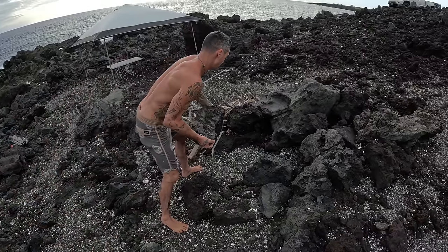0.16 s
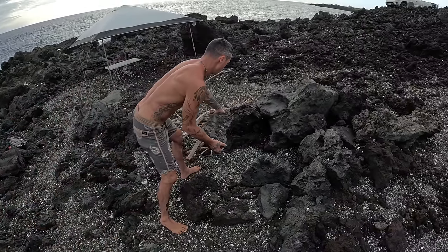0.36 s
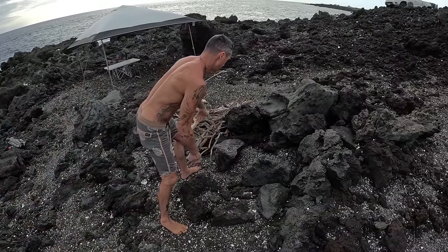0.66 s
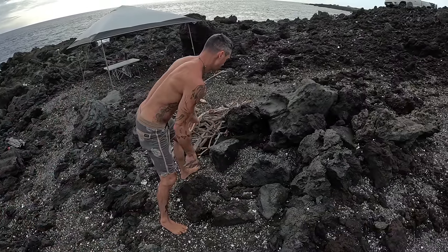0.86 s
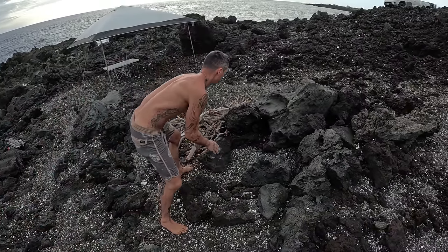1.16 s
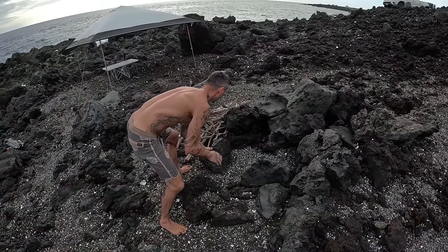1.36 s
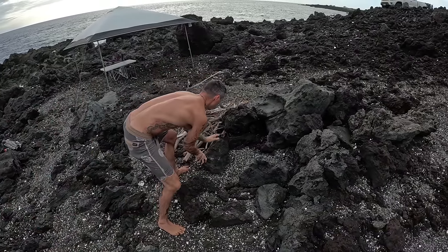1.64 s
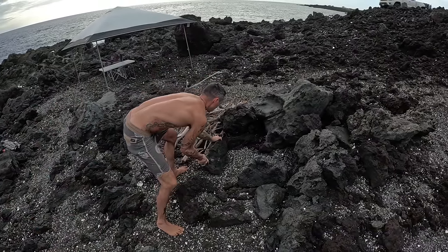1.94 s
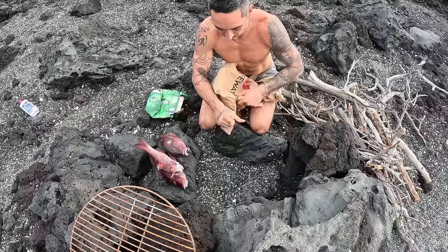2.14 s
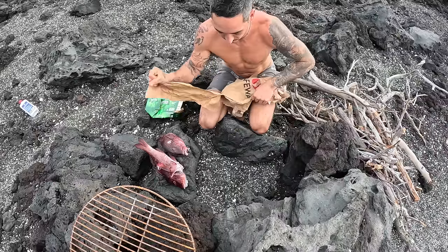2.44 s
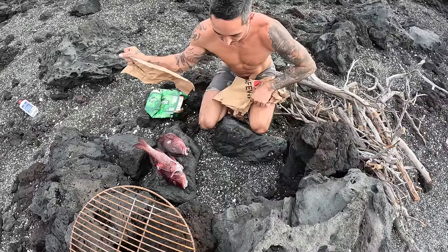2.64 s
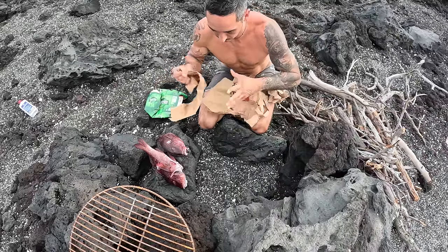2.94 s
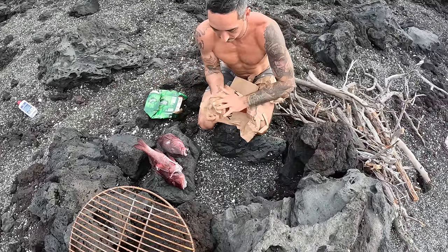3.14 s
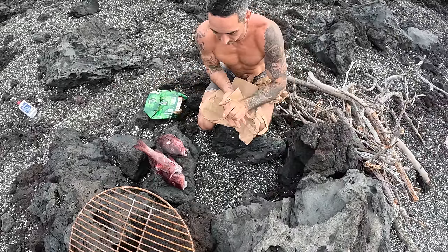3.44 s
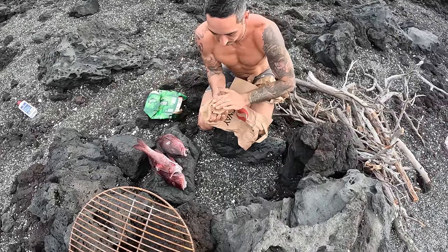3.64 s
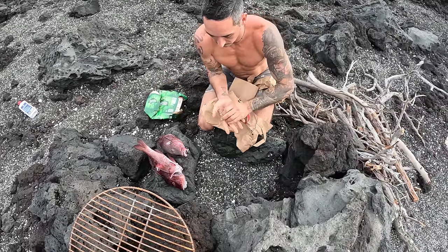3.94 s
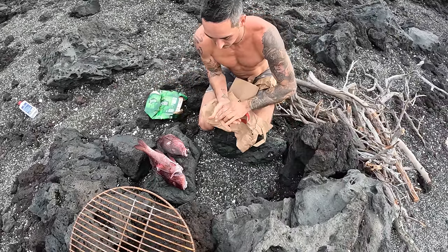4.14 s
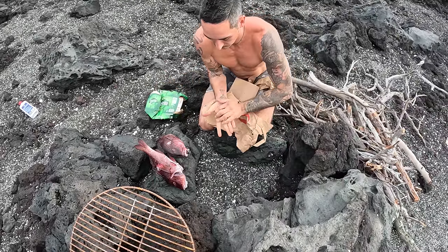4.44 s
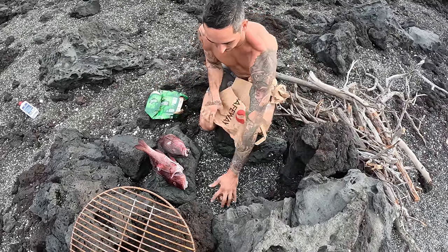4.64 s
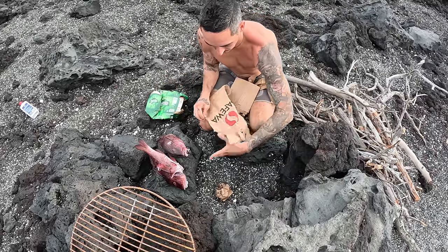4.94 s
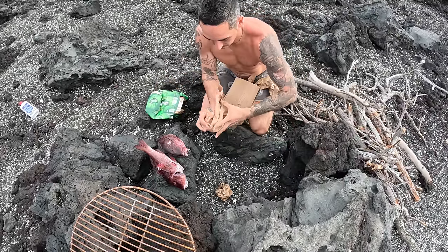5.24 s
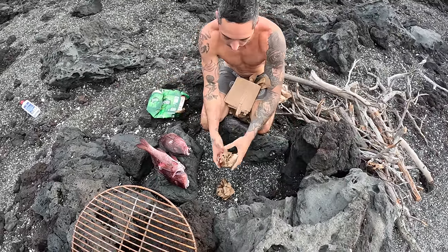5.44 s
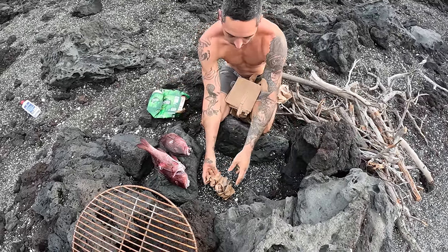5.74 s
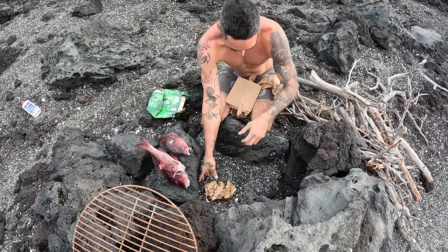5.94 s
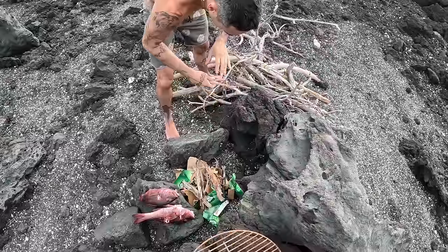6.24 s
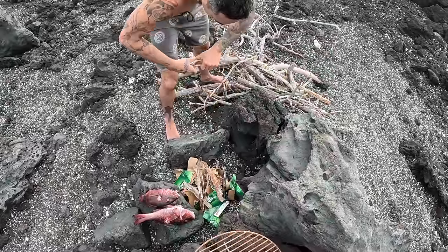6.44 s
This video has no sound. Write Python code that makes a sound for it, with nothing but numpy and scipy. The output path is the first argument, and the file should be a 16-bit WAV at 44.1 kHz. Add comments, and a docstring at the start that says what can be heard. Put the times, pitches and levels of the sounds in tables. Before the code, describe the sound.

An open rocky shore, heard close and nearly mono, with faint distant surf and deep wind buffeting throughout. Small pebble clicks and light gravel shuffling open the scene; at 0.6 s a dry stick cracks sharply with a dull knock and splintery ring. A much weaker crack comes at about 1 s amid a gravel crunch, then quiet stirring. From 2.15 s a paper bag rips in a dense, fibrous pull of about a quarter second, followed by a short, abrupt pull at 2.54 s. Thin high whistles glide faintly near 2.7, 2.9 and 4.1 s. From 2.6 to 4.8 s the paper is kneaded in soft crackling bursts with occasional snaps. Between 4.9 and 5.45 s coarser squeezes bring clustered ringing pops, the strongest at 5.1 s. Pebbles click around 5.6 s, and the wad lands with a tick at 5.9 s. Gusts rumble hardest from 5.7 s to the end.

```python
"""A paper bag rips in two pulls as dense streams of breaking fibres, then is crumpled into a wad and set down:
creases crackle over rubbing noise, and buckling folds snap as short rings. Before the rip, a dry stick cracks
in ringing splinters over a dull knock. Gravel grinds, and pebbles and a paper tick click, as noise; bird-like
whistles glide as sines. Behind, surf swells and wind rumbles on a nearly mono microphone, as shaped noise."""
import sys
import numpy as np
from scipy import signal
from scipy.fft import rfft, irfft, next_fast_len
from scipy.io import wavfile
from scipy.ndimage import map_coordinates

SR = 44100
rng = np.random.default_rng(int(sys.argv[2]) if len(sys.argv) > 2 else 0)


def unload_wav(signal):
    """Save mono or channel-first audio to the path in sys.argv[1] as 16-bit WAV at rate SR, clipped to [-1, 1]."""
    wavfile.write(
        sys.argv[1],
        SR,
        np.round(np.clip(np.atleast_2d(signal).T, -1, 1) * 32767).astype(np.int16),
    )


N = 290619
TIME = np.arange(N) / SR  # seconds


def amp(db):
    """Decibels to gain."""
    return 10 ** (np.asarray(db) / 20)


def unit(x):
    """Scale to rms 1."""
    return x / np.sqrt(np.mean(x ** 2) + 1e-20)


def along(points, hz):
    """Read (Hz, value) points at hz, on a log frequency axis."""
    point_hz, value = np.transpose(points)
    return np.interp(np.log(hz + 1), np.log(point_hz + 1), value)


def filtered(x, response):
    """Filter x by a gain given as a function of frequency."""
    length = next_fast_len(x.shape[-1] + 8192)
    gain = response(np.fft.rfftfreq(length, 1 / SR))
    return irfft(rfft(x, length) * gain, length)[..., :x.shape[-1]]


def coloured(x, spectrum):
    """Tilt x by a table of relative levels over frequency, at rms 1."""
    return unit(filtered(x, lambda hz: amp(along(spectrum, hz))))


def band(x, lo_hz, hi_hz):
    """Causal band-pass with steep skirts."""
    edges_hz = [lo_hz, min(hi_hz, SR / 2 - 1)]
    return signal.sosfilt(signal.butter(3, edges_hz, "band", fs=SR, output="sos"), x)


def wobble(knots_per_s):
    """A smooth random curve through random knots."""
    knots = rng.standard_normal(int(N * knots_per_s / SR) + 4)
    return map_coordinates(knots, [TIME * knots_per_s])


def crackle(slips_per_s, spread_db, t60_s, size=1024):
    """Tiny slips of uneven strength ring a body whose shape, and so its ring, changes every size samples."""
    shape = (N // size + 1, size)
    happens = rng.random(shape) < slips_per_s / SR
    slips = happens * amp(spread_db * np.minimum(rng.standard_normal(shape), 2))
    slips *= rng.choice([-1, 1], shape)
    rings = rng.standard_normal(shape) * amp(-60 * np.arange(size) / SR / t60_s)
    rings /= np.linalg.norm(rings, axis=1, keepdims=True)
    rung = irfft(rfft(slips, 2 * size) * rfft(rings, 2 * size))
    # each block's tail spills into the next
    blocks = rung[:, :size] + np.roll(rung[:, size:], 1, axis=0)
    return unit(blocks.ravel()[:N])


def creases(slips_per_s, spread_db, t60_s):
    """Folds of three sizes crackle independently, each in its own range; the smallest merge into a hiss."""
    ranges_hz = [(150, 1400), (1400, 3000), (3000, 6000)]
    folds = sum(band(crackle(slips_per_s, spread_db, t60_s), lo, hi) for lo, hi in ranges_hz)
    return folds + band(crackle(10 * slips_per_s, spread_db, t60_s), 6000, 20000)


def stroke(rows, attack_s, release_s, sag_db_per_s=0):
    """Body and hiss gains of a run of strokes: each swells, holds or sags, and dies away."""
    power = np.zeros((2, N))
    for start_s, length_s, *levels_db in rows:
        held_s = np.clip(TIME - start_s, 0, length_s)
        after_s = np.maximum(TIME - start_s - length_s, 0)
        swell = np.minimum(held_s / attack_s, 1)
        shape = swell * amp(-sag_db_per_s * held_s) * np.exp(-after_s / release_s)
        power += np.outer(amp(levels_db), shape) ** 2
    return np.sqrt(power)


def rustle(gains, spectrum, grains, rub_db):
    """Grains plus smooth rubbing; the body and the hiss above it each follow their own level."""
    body_gain, hiss_gain = gains
    rubbing = amp(rub_db) * rng.standard_normal(N)
    sound = coloured(grains + rubbing, spectrum)
    body = filtered(sound, lambda hz: 1 / (1 + (hz / 6000) ** 7))
    hiss = sound - body
    return body_gain * unit(body) + hiss_gain * unit(hiss)


BREEZE_DB = -39  # between the gusts
# Gusts over the breeze: middle_s, half_width_s (power falls to 1/e), level_db
GUSTS = [(0.68, 0.18, -31.5), (1.45, 0.041, -32.5), (2.4, 0.21, -32), (2.95, 0.16, -26),
         (4.38, 0.18, -34.5), (4.95, 0.12, -28.5), (5.7, 0.23, -21.5), (6.1, 0.085, -22.5),
         (6.6, 0.17, -24.5)]
# Tone of wind buffeting the microphone: freq_hz, relative_level_db
BUFFET_TONE = [(8, -2.5), (19, -1), (28, -17), (50, -22), (100, -31), (130, -33.5), (175, -40.5),
               (400, -61), (1000, -120)]


def wind(eddy_db=1.5, eddies_per_s=9):
    """Eddies push slowly on the microphone; gusts rise and fall over a steady breeze."""
    power = amp(BREEZE_DB) ** 2
    power = power + sum(amp(db) ** 2 * np.exp(-((TIME - mid_s) / width_s) ** 2) for mid_s, width_s, db in GUSTS)
    eddies = amp(eddy_db * wobble(eddies_per_s))
    return np.sqrt(power) * eddies * coloured(rng.standard_normal(N), BUFFET_TONE)


# Swell of the breakers: time_s, level_db
SURF_SWELL = [(0, -50), (1.02, -47.5), (1.82, -47), (2.1, -44.5), (2.7, -50), (3.2, -50), (3.56, -52.5),
              (4.8, -50.5), (5.5, -49), (6.23, -48), (6.57, -44.5)]
# Tone of the distant sea: freq_hz, relative_level_db
SEA_TONE = [(50, 0), (100, 0.5), (170, -7), (260, -4.5), (420, -2.5), (700, -4), (1000, -8), (2000, -13.5),
            (4000, -21), (7000, -31), (10000, -35.5), (15800, -39)]


def surf():
    """Distant breakers swell slowly, as noise with a falling treble."""
    swell_db = np.interp(TIME, *np.transpose(SURF_SWELL))
    return amp(swell_db + 0.13 * wobble(7.7)) * coloured(rng.standard_normal(N), SEA_TONE)


# Bird-like whistles: start_s, length_s, start_hz, end_hz, level_db (sine peak before flutter)
WHISTLES = [(2.688, 0.046, 8450, 8100, -58), (2.923, 0.14, 8150, 7700, -63), (4.094, .09, 7200, 7850, -60)]


def whistles():
    """Thin, high sines glide while their pitch wavers and their level flutters."""
    out = np.zeros(N)
    for start_s, length_s, start_hz, end_hz, level_db in WHISTLES:
        progress = np.clip((TIME - start_s) / length_s, 0, 1)
        glide_hz = start_hz + (end_hz - start_hz) * progress
        hz = glide_hz * (1 + 0.011 * wobble(110))
        flutter = amp(4 * wobble(90))
        swell = np.sin(np.pi * progress)
        out += amp(level_db) * flutter * swell * np.sin(2 * np.pi * np.cumsum(hz) / SR)
    return out


# Shuffles of the feet: start_s, length_s, crunch_db, grit_db
GRAVEL = [(0.35, 0.11, -55, -57.5), (0.615, 0.028, -40.5, -41.5), (0.705, 0.14, -57.5, -56.5),
          (0.945, 0.04, -36.5, -56), (0.99, 0.089, -46.5, -50.5), (1.08, 0.23, -55, -55),
          (1.3, .24, -59.5, -60), (1.96, .07, -58, -63), (2.01, 0.1, -51, -57)]
# Quiet gravel stirring under and after the shuffles: start_s, length_s, crunch_db, grit_db
GRAVEL_STIR = (0.16, 4.1, -64, -65)
# Tone of the stones: freq_hz, relative_level_db
STONE_TONE = [(300, -14), (1000, -11), (2500, -6.5), (5000, -9.5), (7000, -11), (10000, -12), (12500, -12),
              (15800, -12.5)]
# Clicks of pebbles, and a paper tick as the wad is set down (5.925 s):
# start_s, level_db (before the click trim), pitch_hz
CLICKS = [(0.141, -40.5, 3500), (0.22, -45, 7240), (1.442, -44, 10000), (1.471, -43, 10000),
          (1.675, -47, 7500), (5.583, -33.5, 3820), (5.611, -34.5, 2950), (5.667, -32.5, 4100),
          (5.691, -39.5, 6400), (5.925, -31, 3800), (5.95, -52, 4500)]


def gravel_and_clicks(click_trim_db=-3, click_t60_s=0.023):
    """Feet grind many grains of fine gravel; pebbles, and one paper tick, click as short noise bursts."""
    grit = creases(slips_per_s=2900, spread_db=8, t60_s=0.002)
    gains = stroke(GRAVEL + [GRAVEL_STIR], attack_s=0.029, release_s=0.016)
    out = np.pad(rustle(gains, STONE_TONE, grit, rub_db=-4.0), (0, SR))
    t = np.arange(SR // 20) / SR
    for start_s, level_db, hz in CLICKS:
        click = unit(band(rng.standard_normal(len(t)), hz / 2, hz * 1.42))
        click = click * amp(-60 * t / click_t60_s)
        out[round(start_s * SR):][:len(t)] += amp(level_db + click_trim_db) * click
    return out[:N]


# Cracks of dry wood: break_s, level_db, build_up_s, t60_s, knock_db (relative to level_db)
STICKS = [(0.607, -21, 0.0079, 0.062, -3.5), (0.984, -40.5, 0.049, 0.12, 5.5)]
# Tone of the wood: freq_hz, relative_level_db
WOOD_TONE = [(120, -16), (250, -3), (500, -6), (800, -1), (1300, -8), (1800, -10), (2250, -4), (3000, -7),
             (4500, -13), (7500, -18), (15800, -21)]


def sticks():
    """Dry fibres splinter harder and harder until the wood gives with a dull knock."""
    splinters = coloured(crackle(slips_per_s=9000, spread_db=3, t60_s=0.002), WOOD_TONE)
    knocks = unit(band(rng.standard_normal(N), 26, 166))
    out = np.zeros(N)
    for break_s, level_db, build_s, t60_s, knock_db in STICKS:
        before_s, after_s = np.maximum(break_s - TIME, 0), np.maximum(TIME - break_s, 0)
        out += splinters * amp(level_db - 11.7 * (before_s / build_s) ** 2 - 60 * after_s / t60_s)
        out += knocks * amp(level_db + knock_db - 60 * before_s / 0.012 - 60 * after_s / 0.15)
    return out


# Folds that buckle: start_s, level_db, centre_hz, edge_db (relative to level_db)
SNAPS = [(2.1625, -33.5, 2780, -20), (2.236, -27, 1870, -20), (2.3039, -25, 2010, -8),
         (2.5234, -32, 2680, -21), (2.773, -35.5, 1330, -24), (3.0782, -43.5, 2430, -11),
         (3.107, -35, 1630, -19.5), (3.1876, -28.5, 2360, -30), (3.287, -35.5, 2560, -20),
         (3.343, -36.5, 3230, -19), (4.0248, -37, 1860, -19), (4.4982, -42.5, 1490, -18),
         (4.6878, -35.5, 2350, -16), (4.753, -44, 2450, -13), (4.775, -38.5, 1200, -28),
         (4.914, -28.5, 1380, -39), (4.9748, -35.5, 1900, -34), (4.989, -31.5, 2040, -36),
         (5.012, -36.5, 1520, -33), (5.048, -32, 1830, -24), (5.059, -29, 1080, -36),
         (5.117, -17.5, 1760, -21.5), (5.1587, -34.5, 2030, -20), (5.229, -38, 1450, -14),
         (5.268, -34.5, 2110, -21), (5.2985, -34.5, 1590, -32), (5.313, -32, 2240, -11),
         (5.3249, -31, 1310, -18), (5.4126, -26.5, 2000, -12.5), (5.4292, -24, 1440, -23)]
# Ring modes of the bag: freq_hz, width_hz (not played), strength_db (halved when played)
BAG_MODES = [(943, 56, 15.5), (1686, 35, -15), (2136, 84, -13), (2700, 110, -14), (3500, 110, -9),
             (4070, 160, -7), (4990, 86, -9), (5760, 110, 0), (8000, 310, 2)]
RING_CYCLES = 38.5  # a fold dies by 60 dB in this many cycles, so low folds ring longer


def snaps(reach_octaves=0.58, detune=0.1, scrape_db=-3, thump_db=-13):
    """A fold flips over: the bag rings around the fold's own pitch, with a sharp edge and a push of air."""
    out, t = np.zeros(N + SR), np.arange(SR // 12) / SR
    mode_hz, _, mode_db = np.transpose(BAG_MODES)

    def sized(x):
        """Scale to rms 1 over the first 10 ms."""
        return x / np.std(x[:SR // 100])

    # the buckling runs along the fold for a few milliseconds before the paper rings out
    rise, released_s = np.minimum(t / 0.0005, 1), np.maximum(t - 0.0025, 0)
    for start_s, level_db, hz, edge_db in SNAPS:
        pitch_hz = mode_hz * np.exp(detune * rng.standard_normal(len(BAG_MODES)))
        nearness = np.exp(-(np.log2(pitch_hz / hz) / reach_octaves) ** 2 / 2)
        weight = amp(mode_db / 2) * nearness
        cycles = np.outer(pitch_hz, t) + rng.random((len(BAG_MODES), 1))
        ring = unit(weight @ np.sin(2 * np.pi * cycles))
        noise = rng.standard_normal((3, len(t)))
        fall = rise * amp(-60 * released_s * hz / RING_CYCLES)
        scrape = amp(scrape_db) * unit(band(noise[0], hz * 0.57, hz * 2.35))
        snap = sized(fall * (ring + scrape))
        snap += amp(edge_db) * sized(band(noise[1] * fall ** 2, 3900, 12000))  # the treble dies first
        snap += amp(thump_db) * sized(band(noise[2] * fall, 160, 600))
        out[round(start_s * SR):][:len(t)] += amp(level_db) * snap
    return out[:N]


# Presses of the bag between the palms: start_s, length_s, crinkle_db, rubbing_hiss_db
KNEADING = [(2.6, 0.045, -43, -54), (2.745, 0.058, -41.5, -49), (2.825, 0.04, -43.5, -57.5),
            (2.87, .06, -52, -58), (3.09, 0.11, -43.5, -52), (3.19, .06, -42, -50), (3.245, .12, -35, -46),
            (3.37, 0.11, -44, -59), (3.475, 0.24, -41.5, -49), (3.75, 0.11, -40.5, -49.5),
            (3.84, 0.19, -40.5, -53.5), (4.1, 0.071, -53.5, -74), (4.295, 0.087, -43, -55.5),
            (4.525, 0.1, -46, -57.5), (4.645, 0.12, -43, -55)]
# Quiet paper stirring under the later presses and the wadding: start_s, length_s, crinkle_db, rubbing_hiss_db
PAPER_STIR = (3, 2.5, -52.5, -63)
# Tone of the loose paper: freq_hz, relative_level_db
PAPER_TONE = [(100, -25), (300, -8), (620, -3.5), (900, 4.5), (1500, 1), (2400, 1), (3600, -1.5),
              (5200, -10), (7000, -21), (10000, -26), (15800, -29)]
# Squeezes of the wad, then setting it down: start_s, length_s, crinkle_db, rubbing_hiss_db
WADDING = [(4.895, 0.02, -47, -56), (4.965, 0.06, -42.5, -60.5), (5.05, 0.082, -38, -54.5),
           (5.215, 0.12, -35.5, -49), (5.34, 0.044, -40.5, -52.5), (5.385, 0.053, -32, -42.5),
           (5.47, .25, -55, -68), (5.84, .07, -50, -60), (5.915, .027, -41, -51)]
# Tone of the wad: freq_hz, relative_level_db
WAD_TONE = [(100, -43), (190, 2.5), (330, 2.5), (620, -1.5), (1000, 6.5), (1500, 0.5), (2400, 2),
            (3600, -5.5), (5200, -13.5), (7000, -22.5), (10000, -29), (15800, -31.5)]


def crumpling():
    """Kneading between the palms makes fine creases; squeezing the wad makes fewer, coarser ones."""
    small = creases(slips_per_s=500, spread_db=7.5, t60_s=0.007)
    large = creases(slips_per_s=350, spread_db=7.5, t60_s=0.012)
    kneading = stroke(KNEADING + [PAPER_STIR], attack_s=0.022, release_s=0.012)
    squeezing = stroke(WADDING, attack_s=0.014, release_s=0.014)
    fine = rustle(kneading, PAPER_TONE, small, rub_db=-1)
    coarse = rustle(squeezing, WAD_TONE, large, rub_db=-7)
    return fine + coarse


# One row per pull: start_s, length_s, sheet_db, fibre_hiss_db, attack_s, release_s, sag_db_per_s
RIPS = [(2.148, 0.25, -23, -32, 0.084, 0.077, 8.5), (2.537, 0.078, -19.5, -28.5, 0.0046, 0.0041, 115)]
# Tone of the strip, one list per pull: freq_hz, relative_level_db
RIP_TONES = [
    [(70, -30), (140, -8), (300, -8), (420, -7.5), (530, -1), (700, -3.5), (920, -2), (1300, -5),
     (2100, -2.5), (3200, -6), (5000, -10), (7500, -15), (15800, -18)],
    [(70, -30), (140, -9), (460, -11), (640, -1), (800, -3.5), (950, -3.5), (1150, -6), (2200, -2),
     (3600, -7), (5000, -10), (7500, -14), (15800, -19)],
]


def tearing():
    """Fibres break in a dense stream that catches and runs; the strip rings differently on each pull."""
    out = np.zeros(N)
    for (*pull, attack_s, release_s, sag_db_per_s), tone in zip(RIPS, RIP_TONES):
        catches = amp(2.0 * wobble(260))
        fibres = unit(catches * creases(slips_per_s=2000, spread_db=2.5, t60_s=0.012))
        gains = stroke([pull], attack_s, release_s, sag_db_per_s)
        out += rustle(gains, tone, fibres, rub_db=-11)
    return out


# Level of the faint side signal: freq_hz, gain_db
SIDE_TONE = [(200, -37.5), (600, -41), (1500, -53), (8000, -26.5)]


def scene():
    """Everything sits in the centre, with a trace of width from a short diffuse side signal."""
    near = surf() + whistles() + gravel_and_clicks() + sticks() + snaps() + crumpling() + tearing()
    t = np.arange(SR // 30) / SR
    diffuse = rng.standard_normal(len(t)) * amp(-60 * t / 0.013)
    side = signal.fftconvolve(near, diffuse / np.linalg.norm(diffuse))[:N]
    side = filtered(side, lambda hz: amp(along(SIDE_TONE, hz)))
    mid = near + wind()  # the wind stays fully mono
    return np.array([mid + side, mid - side])


TOP_HZ = 15950


def record(dry):
    """Keep nothing above the band limit."""
    return filtered(dry, lambda hz: hz < TOP_HZ)


dry = scene()
out = record(dry)
unload_wav(out)
```